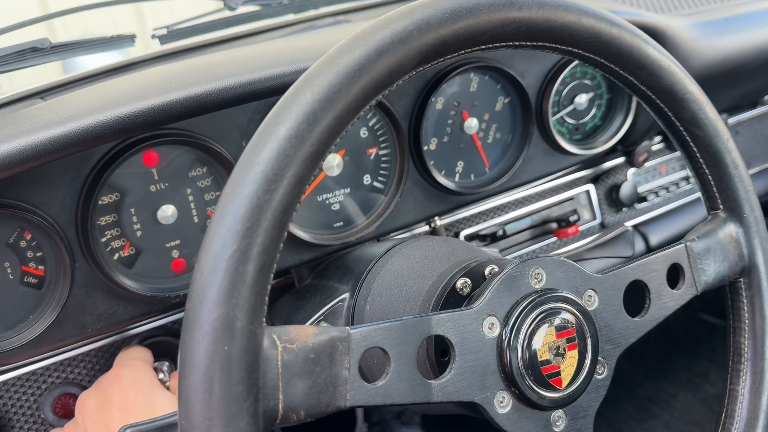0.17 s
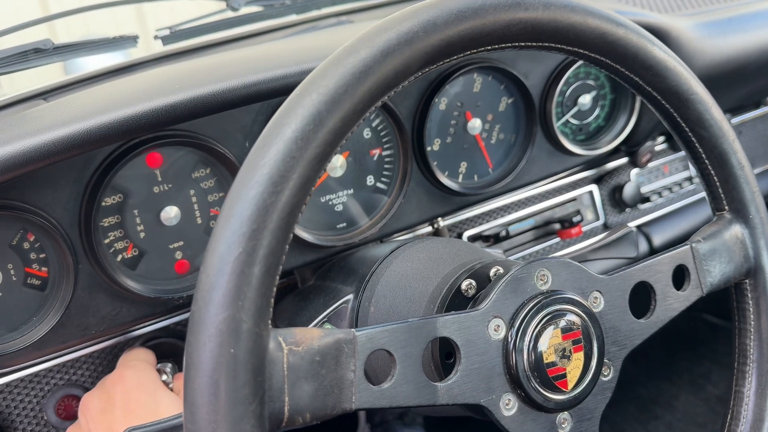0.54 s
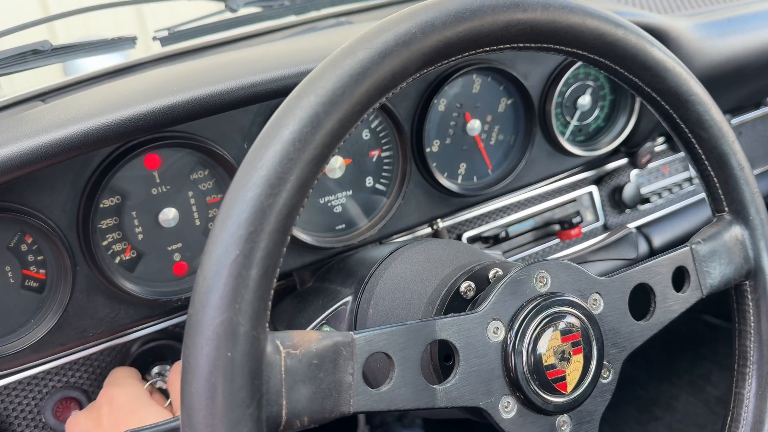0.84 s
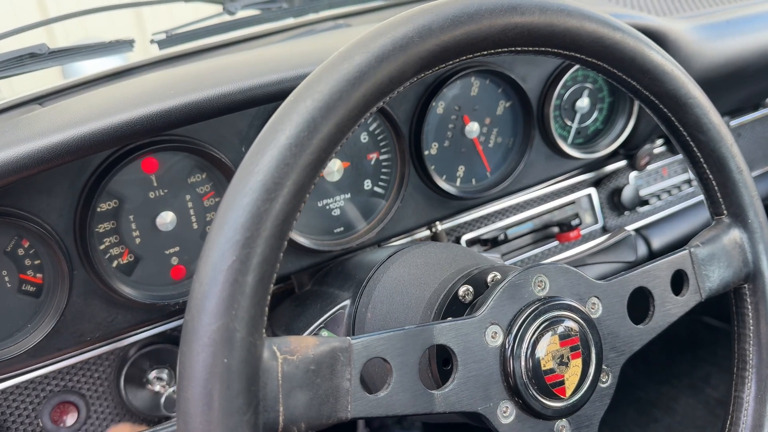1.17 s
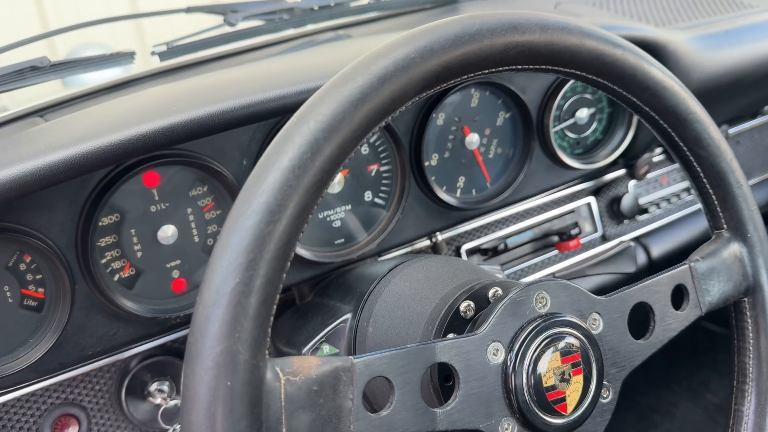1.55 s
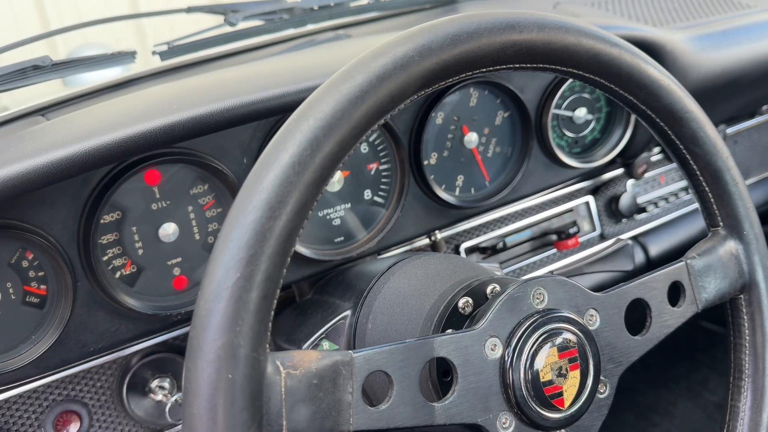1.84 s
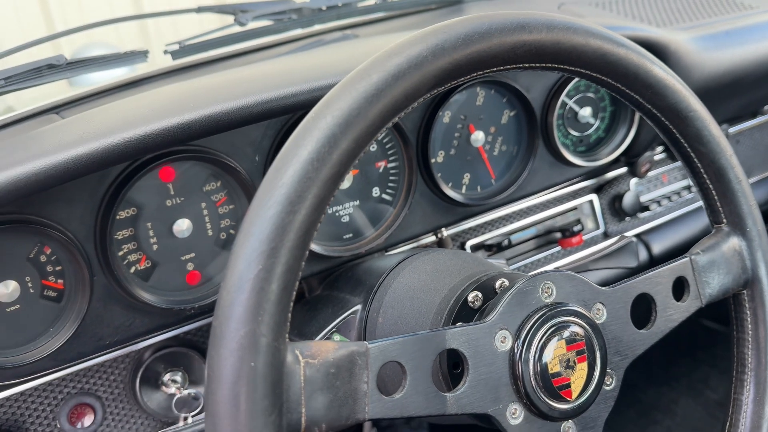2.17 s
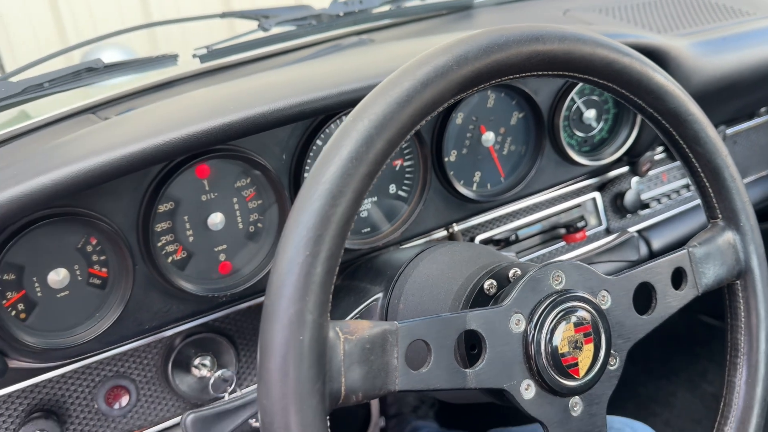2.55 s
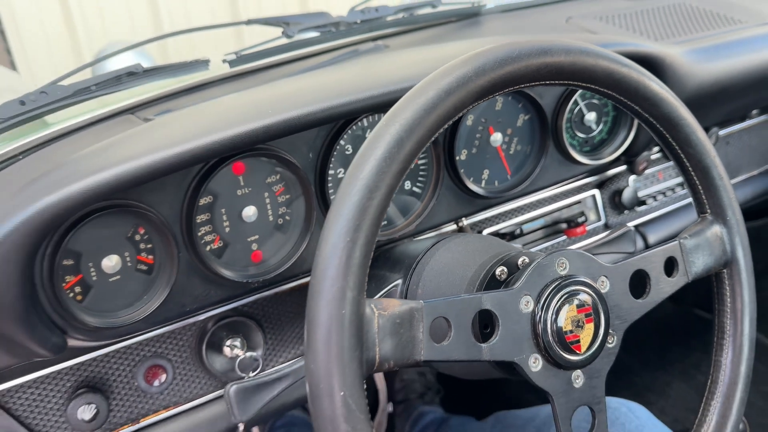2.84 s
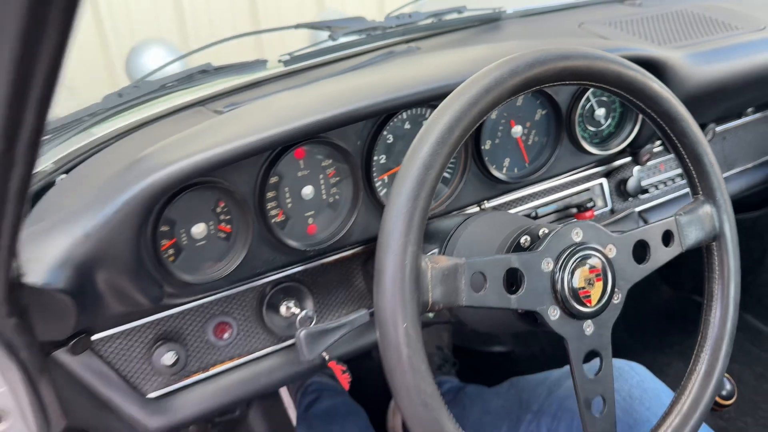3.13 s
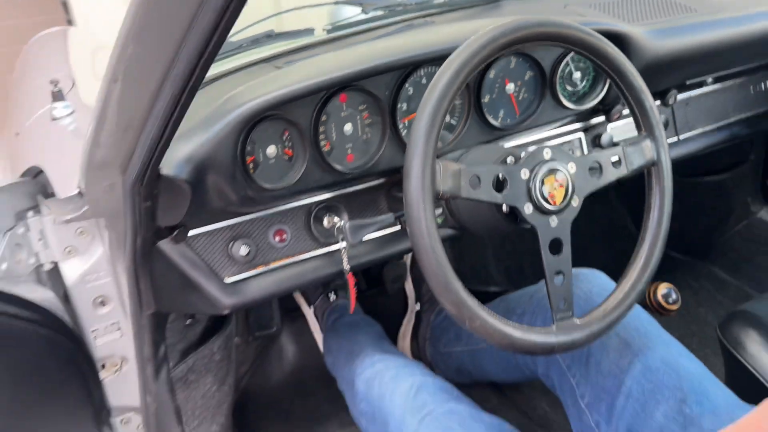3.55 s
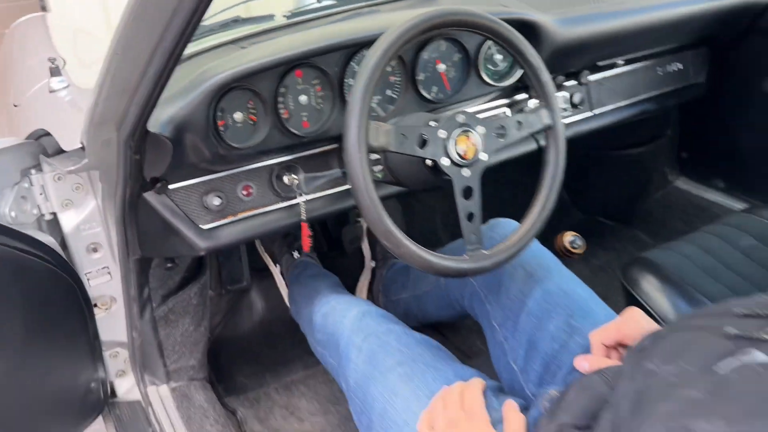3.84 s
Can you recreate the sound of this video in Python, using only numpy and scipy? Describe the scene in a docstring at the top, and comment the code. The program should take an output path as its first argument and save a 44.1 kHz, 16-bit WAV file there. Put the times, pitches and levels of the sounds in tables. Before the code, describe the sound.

A car engine starts with a brief starter whir and thumps, then idles in a deep boom

```python
"""Six-cylinder engine start from the driver's seat

The starter clunks in and whirs, coloured noise with two resonances; its pinion hisses and rasps, a hail of ticks.
Jolts ring low body modes as the body thumps over the compressions and the engine catches.
The idle then booms in the cabin, a stack of tones on the engine cycle over a low rumble, with noisy clatter and whines.
Late on, the microphone draws back towards the open door and the clatter grows clearer. A faint noise lies under all.
"""
import sys
import numpy as np
from scipy import signal
from scipy.fft import rfft, irfft
from scipy.io import wavfile
from scipy.ndimage import uniform_filter1d, map_coordinates

SR = 44100
rng = np.random.default_rng(int(sys.argv[2]) if len(sys.argv) > 2 else 0)


def boost_factor(decibels):
    """Convert a level in decibels to a linear amplitude factor."""
    exponent = np.asarray(decibels, float) / 20
    return 10 ** exponent


def log_audio(samples):
    """Write samples as a 16-bit WAV file to the path given in sys.argv[1]."""
    # one column per channel
    frames = np.atleast_2d(samples).T
    # limit to full scale, then quantise
    limited = np.clip(frames, -1, 1)
    pcm = np.round(limited * 32767).astype(np.int16)
    wavfile.write(sys.argv[1], SR, pcm)


N = 176400
T = np.arange(N) / SR  # seconds
CYLINDERS = 6

# Faint background noise. Each row: frequency in Hz, relative level in dB per Hz.
QUIET_COLOUR = [(30, -9), (220, -18), (3000, -45), (15900, -50)]
# Likeness of left and right. Each row: frequency in Hz, likeness 0-1, left over right in dB.
LEFT_RIGHT_LIKENESS = [(100, 0.23, -8.5), (368, 0.43, 6), (1180, 0.3, 1), (2290, 0.36, 1), (6140, 0.16, 3),
                       (8800, 0.88, -1)]
# Phase between left and right. Each row: frequency in Hz, phase of left ahead of right in radians. Around 9.2
# and 12.4 kHz the two sides oppose.
LEFT_RIGHT_PHASE = [(0, 0), (1810, 3.9), (4050, 12.4), (6200, 12.5), (9100, 3.35), (10900, 0), (15300, -9.2)]
# Course of the starter. Each row: time in seconds, motor whir in dB, pinion hiss in dB.
STARTER_COURSE = [(.046, -47.5, -39), (.07, -28, -29), (.1, -30, -38), (.21, -33, -35), (.29, -26.5, -32),
                  (.34, -30, -36), (.39, -42, -34), (.412, -39, -27.5), (.53, -48, -26.5),
                  (.69, -42, -30.5), (.745, -44, -26.5), (.77, -62, -36.5)]
# Colour of the motor whir. Each row: frequency in Hz, relative level in dB per Hz.
WHIR_COLOUR = [(60, -32), (150, 3.5), (490, -2.5), (800, 4), (1340, -10), (1700, -17), (2200, -1.5),
               (3500, -24.5)]
# Resonances of the motor in its housing. Each row: frequency in Hz, width in Hz, relative level in dB.
WHIR_RESONANCES = [(904, 16, -7), (1349, 29, 8)]
# Colour of the pinion's hiss and rasps. Each row: frequency in Hz, relative level in dB per Hz.
PINION_COLOUR = [(700, -15), (1300, 0.5), (2130, 2), (3100, -2), (5500, 0.5), (8600, -4), (11000, -14.5),
                 (14000, -14.5), (15900, -6)]
# Ringing of the pinion's teeth. Each row: frequency in Hz, relative level in dB, time to fall 60 dB in seconds.
TOOTH_MODES = [(2240, 0, 0.009), (5100, 0, 0.012), (5680, 2, 0.02), (6550, -1, 0.01)]
# Rasps of the pinion's teeth. Each row: start in seconds, length in seconds, level in dB.
TOOTH_RASPS = [(0.058, 0.021, -34.5), (0.433, 0.014, -28.5), (0.486, 0.028, -31), (0.598, 0.023, -28),
               (0.649, 0.026, -37.5), (0.703, 0.019, -23), (.725, 0.015, -31.5)]
# Jolts of the engine on its mounts. Each row: start in seconds, level in dB, brightness in dB per octave.
MOUNT_JOLTS = [(0.078, -5.5, -1.5), (0.098, -12.5, 4), (0.115, -17, 5), (0.143, -5, -6.5),
               (0.215, -26, 5.5), (0.257, -13.5, -4.5), (0.282, -11, -12), (.303, -21.5, -1),
               (.324, -21, -2), (0.367, -23, 5), (.412, -22, 6.5), (.465, -5.5, 2.5), (0.482, -5, 2),
               (0.514, -8, 5.5)]
# Ringing of the car body. Each row: frequency in Hz, level in dB, time to fall 60 dB in seconds.
CAR_BODY_MODES = [(52, -9.5, 0.22), (77, 0, 0.15), (138.6, 1, 0.079), (213, -19, 0.31), (337, -24, .09)]
# Microphone path. Each row: time in seconds, share of the way from dash to door 0-1, clatter level in dB.
MICROPHONE_PATH = [(.4, 0.1, -29), (.5, 0.08, -31), (.8, 0, -31), (2.4, 0.1, -31), (3.02, 0.08, -30.5),
                   (3.28, 0.9, -28.5), (3.62, 1, -27.5), (4, 0.98, -27)]
# Clatter near the dash. Each row: frequency in Hz, relative level in dB per Hz.
DASH_COLOUR = [(150, -27), (300, -1.5), (480, -10.5), (900, -15.5), (1600, -13.5), (2600, -20.5),
               (3150, -27.5), (5600, -27.5), (8500, -36.5), (12000, -41.5), (15000, -44), (15900, -53)]
# Change of the clatter's colour at the door. Each row: frequency in Hz, relative change in dB.
DOOR_CHANGE = [(250, 2.5), (420, -5), (650, 4), (1500, -0.5), (2600, -0.5), (5000, 0), (14000, 2)]
# Whines of fan and gears. Each row: multiple of the cycle, width in Hz, dB near the dash, dB near the door.
WHINE_BANDS = [(56.6, 26, -52, -44), (72.6, 32, -48.5, -43), (87.5, 32, -60, -45),
               (111.4, 32, -46.5, -44.5)]
# A broad band that stands out of the clatter. Each row: time in seconds, centre in Hz, level at the dash in dB.
WHIRR_COURSE = [(1.6, 1620, -58), (2.3, 1540, -40), (3.15, 1430, -37)]
# Course of the engine. Each row: time in seconds, firing rate in Hz, boom level in dB.
ENGINE_COURSE = [(.425, 55.04, -21.5), (.45, 52.6, -9), (.5, 52.8, -20), (.55, 54.2, -8), (.58, 57.5, -8.5),
                 (.61, 57, -5.5), (.65, 59.24, -8), (.95, 61.16, -7.5), (1.52, 62.33, -8),
                 (2.3, 63.13, -9.5), (2.8, 62.2, -8.5), (3.39, 64, -10), (4, 63.07, -8.5)]
# Tones of the boom. Each entry: multiple of the full engine cycle.
BOOM_MULTIPLES = [4, 5, 6, 8, 9, 10, 11, 12, 14, 16, 18, 21, 24, 27, 33, 39]
# Their levels under the boom level. Each row: dB near the dash, dB near the door.
BOOM_TONE_LEVELS = [(-24, -27), (-36, -25), (-0.5, -0.5), (-20, -19), (-20.5, -16.5), (-31, -29),
                    (-23, -21), (-21, -23), (-23, -27), (-30.5, -30), (-21.5, -35), (-24, -26),
                    (-36, -19.5), (-37, -29.5), (-35.5, -35), (-36.5, -34.5)]
# Rumble under the boom. Each row: frequency in Hz, relative level in dB per Hz.
RUMBLE_COLOUR = [(20, -30), (40, 7.5), (90, -15), (140, -3.5), (200, -5.5), (300, -16.5), (700, -98)]

ENGINE_START_S = ENGINE_COURSE[0][0]


def evened(x):
    """Brings a sound to rms 1."""
    return x / np.sqrt(np.mean(x ** 2) + 1e-20)


def read(points, hz):
    """Reads a spectrum in dB, straight between its points on a log frequency scale."""
    f, value = np.transpose(points)
    return np.interp(np.log(hz + 1), np.log(f + 1), value)


def column(table, index, t=T):
    """Reads one column of a table as a curve over its first column."""
    rows = np.array(table)
    return np.interp(t, rows[:, 0], rows[:, index])


def slow(rate_hz):
    """Slow chance of rms about 1: a smooth curve through random points, two per period of the rate."""
    points = rng.standard_normal(400)
    return map_coordinates(points, [5 + 2 * min(rate_hz, 40) * T], order=3)


def resonate(x, hz, width):
    """A resonance of gain 1 that follows the curve hz: shift down, smooth, shift back up."""
    turn = np.exp(2j * np.pi * np.cumsum(hz * np.ones(N)) / SR)
    r = np.exp(-np.pi * width / SR)
    return 2 * (turn * signal.lfilter([1 - r], [1, -r], x / turn + 1e-18)).real


def noise_band(noise, hz, width):
    """Noise through the same resonance twice, for a steeper band of rms 1."""
    return evened(resonate(resonate(noise, hz, width), hz, width))


def ring(modes, length):
    """Decaying sines, one row for each mode."""
    t = np.arange(0, length, 1 / SR)
    return np.array([boost_factor(db - 60 * t / t60) * np.sin(2 * np.pi * hz * t) for hz, db, t60 in modes])


def hail(per_s, spread_db):
    """Random ticks of uneven size and either sign, rms 1."""
    size = boost_factor(spread_db * np.minimum(rng.exponential(1, N), 5))
    ticks = size * (rng.random(N) < per_s / SR)
    return evened(ticks * rng.choice([-1, 1], N))


def spread(mono, colour, patch_db, change=None, share=0):
    """Colours a sound with patchy flicker, and spreads it over left and right, which are only partly alike."""
    hz, t, z = signal.stft(np.array([mono, rng.standard_normal(N)]), SR, nperseg=512, noverlap=384)
    db = read(colour, hz)[:, None]
    if change is not None:
        db = db + read(change, hz)[:, None] * np.interp(t, T, share)
    patches = uniform_filter1d(rng.standard_normal(z[0].shape), 5, 0)
    patches = evened(uniform_filter1d(patches, 20, 1))
    same = np.clip(column(LEFT_RIGHT_LIKENESS, index=1, t=hz), 0, 1)[:, None]
    balance = boost_factor(-column(LEFT_RIGHT_LIKENESS, index=2, t=hz))
    turn = (balance * np.exp(-1j * column(LEFT_RIGHT_PHASE, index=1, t=hz)))[:, None]
    right = turn * (same * z[0] + np.sqrt(1 - same ** 2) * z[1])
    z = np.array([z[0], right]) * boost_factor(db + patch_db * patches)
    return evened(signal.istft(z, SR, nperseg=512, noverlap=384)[1][:, :N])


def quiet():
    """Steady faint noise, strongest in the bass."""
    return boost_factor(-47) * spread(rng.standard_normal(N), QUIET_COLOUR, patch_db=0.61)


def starter_whir(on, after):
    """The motor whirs in its housing: noise plus two resonances, stopping fast after the start."""
    air = rng.standard_normal(N)
    peaks = evened(sum(boost_factor(db) * evened(resonate(air, hz, width)) for hz, width, db in WHIR_RESONANCES))
    hum = evened(air + boost_factor(-8) * peaks)
    level = boost_factor(column(STARTER_COURSE, index=1) - 200 * after)  # falls 200 dB per second at the end
    return on * level * spread(hum, WHIR_COLOUR, patch_db=2.4)


def pinion(on, after):
    """The pinion hisses, a dense hail of ticks, and short rasps make its teeth ring."""
    ring_db, rise_s, patch_db = -5, 0.003, 1.8
    settle_db_per_s = 12  # the bright hiss dies away slowly after the start
    ticks = hail(per_s=7000, spread_db=2.6)
    hiss = spread(ticks, PINION_COLOUR, patch_db)
    rings = evened(signal.oaconvolve(ticks, ring(TOOTH_MODES, 0.04).sum(0))[:N])
    rasp = spread(evened(ticks + boost_factor(ring_db) * rings), PINION_COLOUR, patch_db)
    strokes = np.zeros(N)
    for s, length, db in TOOTH_RASPS:
        fall = 52 * np.maximum((T - s) / length - 1, 0)  # 52 dB over each further length
        strokes += boost_factor(db - fall) * np.clip((T - s) / rise_s, 0, 1)
    hiss_level = boost_factor(column(STARTER_COURSE, index=2) - settle_db_per_s * after)
    return on * hiss_level * hiss + strokes * rasp


def starter():
    """Motor and pinion set in together within a millisecond; each dies away at its own rate."""
    on = np.clip((T - STARTER_COURSE[0][0]) / 0.00084, 0, 1)
    after = np.maximum(T - STARTER_COURSE[-1][0], 0)
    return starter_whir(on, after) + pinion(on, after)


def jolts():
    """Each jolt rings the same low body modes, tilted towards the upper or lower ones by its brightness."""
    rise_s = 0.0096
    modes, out = ring(CAR_BODY_MODES, 0.3), np.zeros(N)
    rise = np.minimum(np.arange(modes.shape[1]) / SR / rise_s, 1)
    octaves = np.log2(np.array(CAR_BODY_MODES)[:, :1] / CAR_BODY_MODES[0][0])  # above the first mode
    for s, db, bright_db in MOUNT_JOLTS:
        at = round(s * SR)
        out[at:at + len(rise)] += rise * (boost_factor(db + bright_db * octaves) * modes).sum(0)
    return out


def valve_clatter(place, beat):
    """Valves and air: beating noise with uneven valve-gear taps in it, changing colour towards the door."""
    taps = hail(per_s=1600, spread_db=2.6)
    noise = evened(rng.standard_normal(N) + boost_factor(-7) * taps)
    level = boost_factor(column(MICROPHONE_PATH, index=2) + beat)
    return level * spread(noise, DASH_COLOUR, 0.72, DOOR_CHANGE, place)


def whines(cycle_hz, place):
    """Fan and gears: wavering narrow bands of noise that follow the engine speed."""
    waver_db, waver_hz = 2.0, 5.5
    out = np.zeros((2, N))
    for k, width, dash_db, door_db in WHINE_BANDS:
        a, b = (noise_band(rng.standard_normal(N), k * cycle_hz, width) for _ in range(2))
        level = boost_factor(dash_db + (door_db - dash_db) * place + waver_db * slow(waver_hz))
        out += level * np.array([a, 0.8 * a + 0.22 * b])
    return (T > ENGINE_START_S) * out


def whirr(place, beat):
    """A broad band of beating noise swells out of the clatter and sinks as the microphone nears the door."""
    width_hz = 260
    hz = column(WHIRR_COURSE, index=1)
    band = np.array([noise_band(side, hz, width_hz) for side in rng.standard_normal((2, N))])
    return (T > ENGINE_START_S) * boost_factor(column(WHIRR_COURSE, index=2) + beat) * (1 - place) * band


def clatter(cycle, cycle_hz, place):
    """Noise that beats at the firing rate and, more strongly, at half of it; whines join it."""
    beat_db, flicker_db = 0.92, 0.75
    pulse = np.cos(2 * np.pi * 3 * cycle) + 0.2 * np.cos(2 * np.pi * 6 * cycle)
    beat = beat_db * pulse + flicker_db * slow(4.9)
    fade_in = np.clip((T - MICROPHONE_PATH[0][0]) / 0.04, 0, 1)
    return fade_in * (valve_clatter(place, beat) + whines(cycle_hz, place) + whirr(place, beat))


def rumble():
    """Low noise between the tones of the boom, slightly different on the two sides."""
    z = rfft(rng.standard_normal((2, N))) * boost_factor(read(RUMBLE_COLOUR, np.fft.rfftfreq(N, 1 / SR)))
    middle, side = evened(irfft(z, N))
    return boost_factor(-24.5) * (middle + np.array([[0.25], [-0.25]]) * side)


def boom(cycle, place):
    """Exhaust beats: each multiple of the cycle is a tone, all but the firing tone wavering, over a rumble."""
    waver_db, waver_rad, waver_hz = 1.2, 0.15, 6.0
    crest_turns = 0.035  # the tones crest nearly together once a cycle, this far ahead of its start
    family_lead_rad = (-0.6, -0.1, 0.6)  # every third multiple shares one small lead
    door_lag_rad = 0.19  # grows by this much per multiple above the firing tone
    pan_db, lead_rad = (-1.1, 1.4), (0.17, 0.18)  # left over right, lead of the left: at the dash, at the door
    sides = np.array([[0.5], [-0.5]])
    lead = sides * np.interp(place, [0, 1], lead_rad) / CYLINDERS
    tones = np.zeros((2, N))
    for k, (dash_db, door_db) in zip(BOOM_MULTIPLES, BOOM_TONE_LEVELS):
        db = dash_db + (door_db - dash_db) * place
        angle = 2 * np.pi * k * (cycle + crest_turns) - door_lag_rad * place * (k - CYLINDERS)
        if k != CYLINDERS:
            db = db + waver_db * slow(waver_hz)
            angle = angle + family_lead_rad[k % len(family_lead_rad)] + waver_rad * slow(waver_hz)
        tones += np.sqrt(2) * boost_factor(db) * np.cos(angle + k * lead)
    pan = boost_factor(sides * np.interp(place ** 2, [0, 1], pan_db))
    fade_in = np.clip((T - ENGINE_START_S) / 0.012 + 1, 0, 1)  # full at the engine's start
    return fade_in * boost_factor(column(ENGINE_COURSE, index=2)) * (tones * pan + rumble())


def scene():
    """One engine cycle and one microphone path drive boom and clatter; starter, jolts and quiet are added."""
    cycle_hz = column(ENGINE_COURSE, index=1) / CYLINDERS  # each cylinder fires once a cycle
    cycle = np.cumsum(cycle_hz) / SR
    place = np.clip(column(MICROPHONE_PATH, index=1), 0, 1)
    return quiet() + starter() + jolts() + clatter(cycle, cycle_hz, place) + boom(cycle, place)


def roll_off(x):
    """The treble ends steeply here."""
    return signal.sosfilt(signal.butter(12, 15940, fs=SR, output="sos"), x)


def record(dry):
    """The microphone loses the deepest bass and rounds off the highest peaks."""
    low_cut_hz, ceiling = 22.2, 1.6
    high_pass = signal.butter(2, low_cut_hz, "high", fs=SR, output="sos")
    cut = signal.sosfiltfilt(high_pass, dry)
    return roll_off(ceiling * np.tanh(cut / ceiling))


dry = scene()
out = record(dry)
log_audio(out)
```